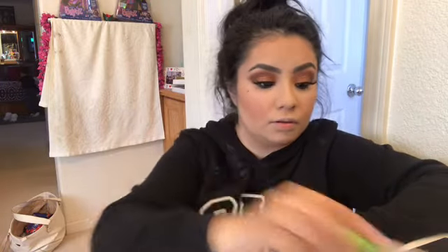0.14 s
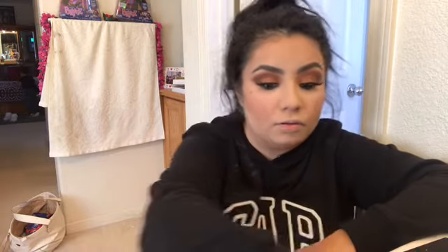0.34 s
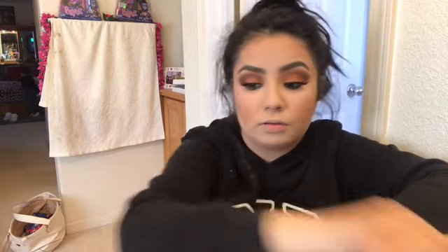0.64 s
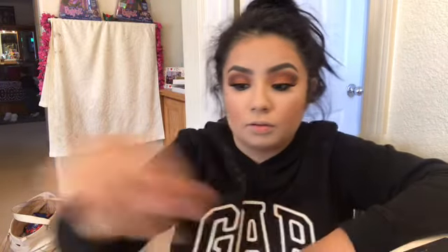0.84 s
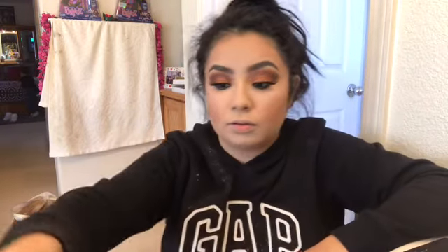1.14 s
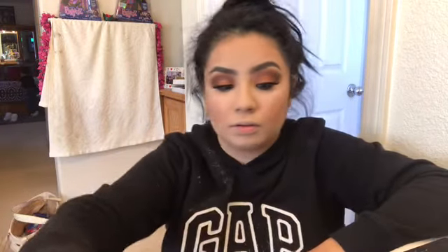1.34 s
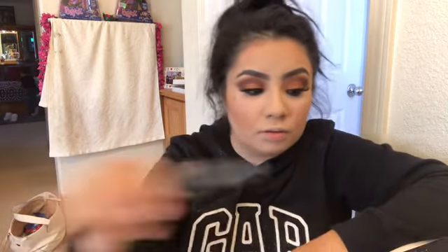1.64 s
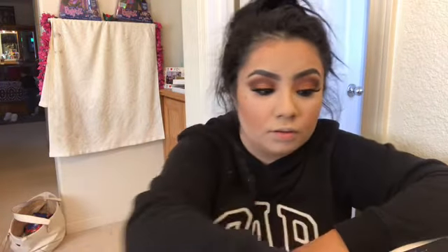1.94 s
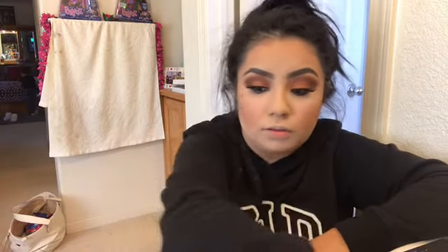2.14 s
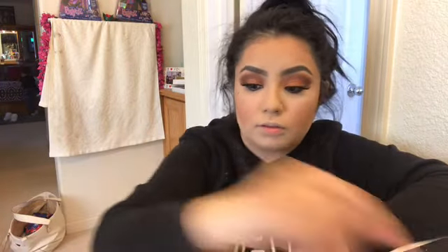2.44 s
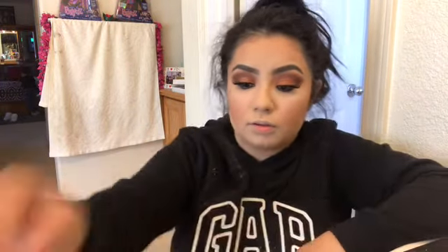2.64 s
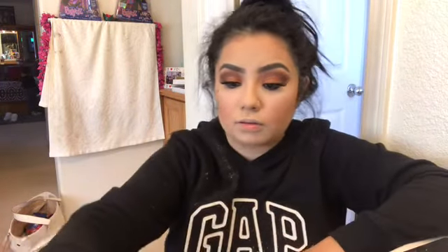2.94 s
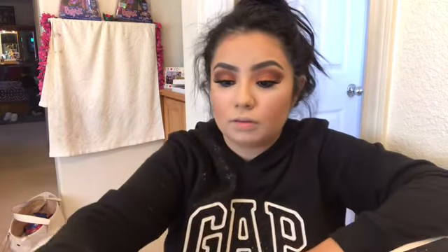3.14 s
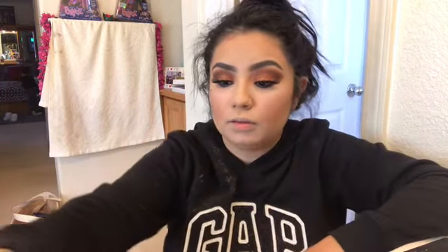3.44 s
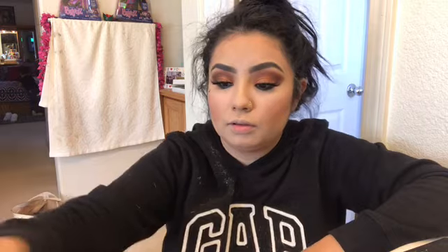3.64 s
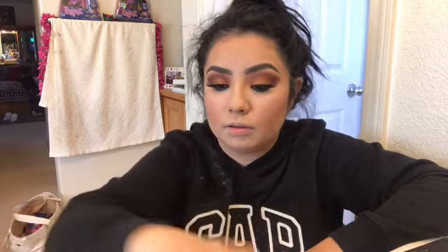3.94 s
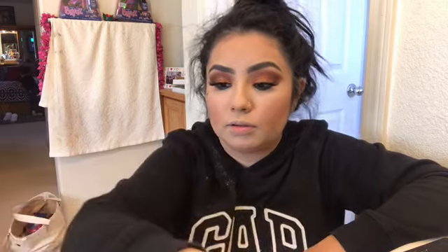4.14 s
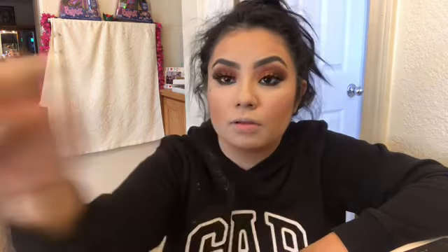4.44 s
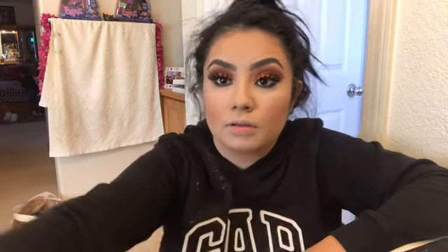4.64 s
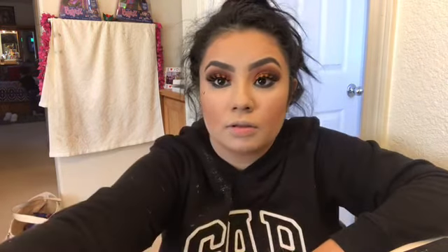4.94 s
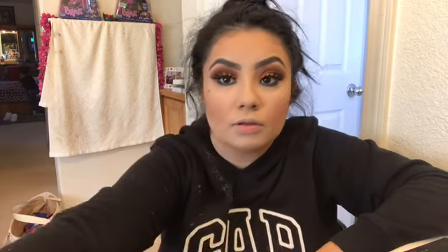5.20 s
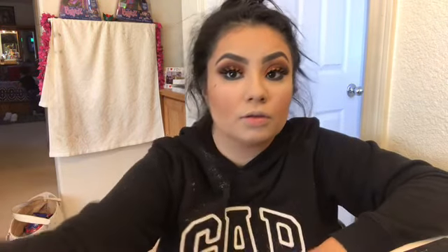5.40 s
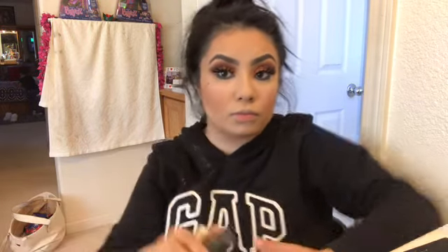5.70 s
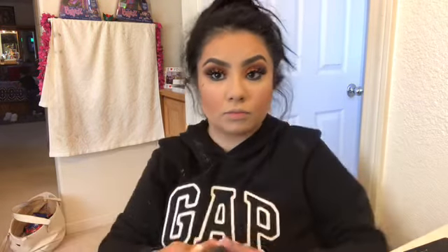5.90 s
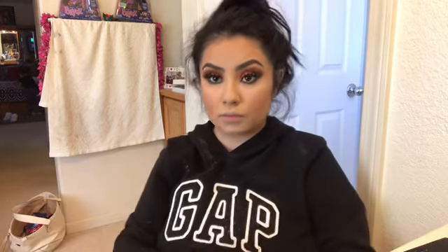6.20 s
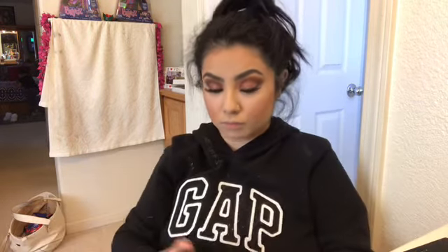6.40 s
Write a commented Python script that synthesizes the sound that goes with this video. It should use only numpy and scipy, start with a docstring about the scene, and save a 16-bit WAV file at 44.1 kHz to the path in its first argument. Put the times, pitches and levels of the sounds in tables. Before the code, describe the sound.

Small plastic items are put down on a hollow-sounding table, close to the microphone. Early clicks and brief grainy scrapes are quiet, with long gaps between taps. Muffled arm bumps lead into the loudest moment, a burst of several hard clacks with a low boom. A dull knock follows, then a ringing case snap and tiny last clicks in lightly reverberant room air.

```python
"""A table top in a small room: small cosmetics land on it, click together and slide, heard by a microphone on it.
Landings excite modes of the top and a dense crack of the item; treble arrives before bass, and a low mode booms.
Hand-held plastic clicks and clinks with much room, a hollow case rings when snapped, soft bumps thud.
Uneven scrapes are grainy noise; beneath lie steady room air, hiss and faint ticking of the electronics."""
import sys
import numpy as np
from scipy import signal
from scipy.fft import rfft, irfft
from scipy.io import wavfile
from scipy.ndimage import uniform_filter1d, map_coordinates

SR = 44100
rng = np.random.default_rng(int(sys.argv[2]) if len(sys.argv) > 2 else 0)


def wrap_up_sound(samples):
    """Save the sound to the file named by the first command line argument, as 16-bit audio."""
    columns = np.atleast_2d(samples).T
    # keep every value between -1 and 1, then stretch to whole-number steps
    tamed = np.clip(columns, -1, 1)
    steps = np.round(tamed * 32767).astype(np.int16)
    wavfile.write(sys.argv[1], SR, steps)


N = 289334

# Landings. Each row: treble arrival in seconds, level in dB, weight (lowest band) in dB, hardness in dB per octave,
# share of the free ring time, boom in dB before BOOM_LIFT_DB, travel time through the top at 1 kHz in seconds.
LANDINGS = [(.478, -45, -6, -4, 0.54, -70, 0.0013), (0.603, -43, 4.5, -4.5, 0.11, -52, .003),
            (1.376, -32.5, -6.5, 3.5, 0.63, -45.5, 0.0043), (2.919, -37.5, 1, -1, 0.76, -44, 0.0077),
            (3.036, -41, 1.5, 4.5, 0.6, -55.5, 0.0063), (4.166, -51, 3.5, 0, .9, -51.5, 0.0013),
            (4.744, -15.5, -5.5, -1, 0.44, -31.5, 0.00078), (4.753, -18.5, -2.5, 0, 0.86, -25.5, 0.00084),
            (4.761, -20.5, -7, 2.5, 0.28, -26.5, .0008), (4.771, -24.5, 6, 6.5, .85, -24, .0008),
            (4.787, -20, 2, -4, .5, -29.5, .0014), (4.816, -38.5, 10, -2.5, 0.15, -31, .0014),
            (5.203, -24, -2, -10, 0.4, -27, 0.00096), (5.249, -41, -8, -2.5, 0.66, -35, 0.0012)]
# Plastic touching in the hand. Each row: start in seconds, level in dB before CLICK_TRIM_DB,
# weight (lowest band) in dB, hardness in dB per octave.
HAND_CLICKS = [(.423, -70, -2, 2), (.44, -48.5, 0, 2), (.455, -49, 6, -2), (.474, -48.5, 4, -3.5),
               (.486, -52.5, -0.5, -2.5), (.53, -47, -26, -7), (.55, -53.5, 0, -6.5), (.651, -56, 9, 3),
               (2.002, -65.5, 6, 5.5), (2.182, -52, 2, 0), (4.16, -48, -21, 3.5), (4.18, -55.5, -2, -0.5),
               (4.214, -46.5, -16.5, -3.5), (4.953, -63, -8, 4.5), (5.847, -54.5, -6, 8.5),
               (5.88, -35, -9.5, 1), (6.46, -68, 2, 7), (6.534, -58, -6.5, -8)]
# Soft bumps of hand and arm. Each row: start in seconds, level in dB, weight (lowest band) in dB.
SOFT_BUMPS = [(1.326, -59, 5.5), (2.108, -59, 0.5), (2.306, -60, -3), (4.111, -67, 18), (4.324, -62.5, 12),
              (4.372, -50, -3), (4.453, -47, -6.5), (4.488, -61, 0), (4.531, -65, 13.5), (4.59, -56, -4),
              (5.069, -51, -5), (5.185, -51.5, 0), (5.382, -68.5, 8.5)]
# Snaps of the hollow case. Each row: start in seconds, dry ring peak in dB.
CASE_SNAPS = [(5.848, -37), (5.882, -26.5), (5.915, -34), (5.938, -36.5), (6.375, -52)]
# Pushes along the top. Each row: fastest moment in seconds, level there in dB.
PUSHES = [(.48, -46), (0.629, -56), (1.47, -54), (1.52, -55.5), (2.03, -61.5), (2.21, -57), (2.37, -64.5),
          (4.46, -61.5), (4.74, -55.5)]
# Things of one clear pitch: caps and tubes, and at 5.879 s the high mode of the hollow case. Each row: start in
# seconds, pitch in Hz, level in dB, t60 in seconds.
CLINKS = [(2.002, 2070, -48.5, 0.031), (2.089, 2050, -49.5, 0.031), (2.183, 1950, -34, 0.017),
          (4.771, 2150, -14.5, 0.018), (5.25, 1350, -20.5, 0.0097), (5.879, 4960, -54.5, .05),
          (6.335, 1410, -44.5, 0.027)]

# Modes of table top, case and padded contact. Each row: frequency in Hz, relative level in dB,
# free t60 in seconds (each use shortens it by a share).
TABLE_MODES = [(72, -21.5, .3), (173, -8, 0.081), (247, -12.5, 0.19), (352.3, -12, 0.33),
               (420, -12.5, 0.23), (472.5, -9, 0.2), (538.5, 2, 0.13), (668, 0, 0.078), (795, -0.5, 0.089),
               (864, -0.5, 0.13), (919.5, -17, 0.09), (1200, 2.5, 0.072), (1306, -3.5, 0.042),
               (1376, -4.5, 0.11), (1470, -3.5, 0.12), (1571, -2, 0.086), (2025, -27, .05),
               (2080, -12, 0.066), (2395, -9.5, .07), (2403, -5, 0.11), (2510, -7, 0.088)]
CASE_MODES = [(543, -4, 0.22), (578, -0.5, 0.15), (602, 4.5, 0.16), (686, -6, 0.19), (686.4, 6, 0.41),
              (936, -7, 0.19), (1086, -15, 0.25), (1550, -29, 0.17), (2366, -8.5, 0.12), (2210, -19, 0.38),
              (2460, -7, 0.11), (2530, -11, 0.28), (3370, -19.5, 0.15)]
PADDED_MODES = [(79, -13, 0.12), (121, -16, 0.62), (166, -5, 0.083), (231, 2.5, 0.085), (293, -1, 0.043),
                (475.4, 1, 0.075), (636, -15.5, .06), (910, -4, 0.18)]

# Colours of item crack, wall reflections, scrape, room air, hiss and rim tick.
# Each row: frequency in Hz, relative spectral level in dB.
CRACK_SPECTRUM = [(30, -41), (100, -15.5), (300, 0), (650, 7.5), (1500, 1), (1800, -3), (2150, 6.5),
                  (2600, 2.5), (2950, -12), (3400, -18), (4000, -49.5), (6500, -48), (15000, -66)]
WALL_SPECTRUM = [(40, -27), (150, 1.5), (600, 0), (1000, -4.5), (1500, 4.5), (1900, -4.5), (2300, 4),
                 (2550, 3), (2900, 2.5), (3500, 9.5), (8000, -9.5)]
SCRAPE_SPECTRUM = [(50, -13), (120, 1), (240, -19), (320, 5.5), (450, -6), (650, 3.5), (850, -7),
                   (1000, -3.5), (1300, -7.5), (1800, -14), (2450, -14), (3000, -33.5), (4200, -63.5)]
AIR_SPECTRUM = [(12, -52), (20, -30.5), (46, -7.5), (117, -3.5), (151, -11.5), (179, -8), (236, -10),
                (305, -10.5), (339, -10), (476, -11.5), (1000, -16), (1110, -17.5), (3230, -22.5),
                (4200, -46.5), (7110, -120)]
HISS_SPECTRUM = [(2500, -33), (3500, 1.5), (4300, 1), (5000, -3), (5600, 0.5), (6800, -1), (8000, -5),
                 (9700, -6), (10400, -11), (11300, -6.5), (15700, -8.5)]
RIM_SPECTRUM = [(500, -26), (2500, 6.5), (3300, -2.5), (4300, -4), (5100, -9), (5600, -13), (6800, -13.5),
                (8000, -28), (15000, -22.5)]
# Colour of the electronic ticking. Each row: frequency in Hz, relative spectral level in dB.
TICKING_SPECTRUM = [(600, -23.5), (1700, -2), (2500, 9.5), (3400, -12.5), (4300, -18.5), (8000, -42.0)]
# Decay of the room. Each row: frequency in Hz, t60 in seconds.
ROOM_T60 = [(150, 0.58), (600, .42), (1700, 0.31), (2400, 0.4), (3200, 0.21), (5000, .22), (12000, .12)]

# Tone bands of a contact. Each row: lower edge in Hz, upper edge in Hz.
TONE_BANDS_HZ = [(150, 450), (450, 1000), (1000, 1800), (1800, 2700), (2700, 3800)]
# Usual tone of landings, clicks and bumps. Each entry: level in dB for one tone band, relative to the contact.
LANDING_BANDS_DB = [-6, 0.5, -6.5, -13.5, -29.5]
USUAL_CLICK_BANDS_DB = [0, -0.5, 0.5, -0.5, -15.5]
USUAL_BUMP_BANDS_DB = [1.5, -0.5, -18, -24, -44]

HIT_SIZE = 32768  # samples
AGE_S = np.arange(HIT_SIZE) / SR
HIT_HZ = np.fft.rfftfreq(HIT_SIZE, 1 / SR)
TIME_S = np.arange(N) / SR
TOP_HZ = 15750
BLOW_S = 0.012  # span over which contact levels are rms
KNOCK_ROOM_DB, CRACK_FREE_T60_S = -21, 0.14
EDGE_PATH, EDGE_DB = 3.2, -9.5  # wave back from the edge: path over the direct one, level
BOOM_LIFT_DB, CLICK_TRIM_DB = 1.5, -2.5
CLICK_USUAL_T60_S, CLICK_USUAL_DB, CLICK_DOUBLING_DB = 0.038, -47.5, 41  # t60 doubles per CLICK_DOUBLING_DB
SLIDE_RISE_DB_PER_S, SLIDE_FALL_DB_PER_S = 217, 118.5
# rim tick: dry peak at a firm blow, dB per dB of force, dB per unit of hardness
RIM_DB, FIRM_BLOW_DB, RIM_GROWTH, RIM_PER_HARDNESS_DB = -50, -19, 1.3, 3.5
CASE_HARDNESS_DB_PER_OCTAVE = 2.5
AIR_DB, HISS_DB = -67.5, -75


def amp(db):
    """Decibels to gain."""
    return 10 ** (np.asarray(db) / 20)


def unit(x):
    """Scale to rms 1."""
    return x / np.sqrt(np.mean(x ** 2) + 1e-20)


def fade(t_s, t60_s):
    """Exponential decay, 60 dB in t60_s."""
    return np.exp(-np.log(1000) * t_s / np.maximum(t60_s, 1e-3))


def along(points, hz):
    """Interpolate (Hz, value) points on a log frequency axis."""
    point_hz, values = np.transpose(points)
    return np.interp(np.log(hz + 1), np.log(point_hz + 1), values)


def add(track, start_s, sound):
    """Mix a sound into a track."""
    start = round(start_s * SR)
    track[start:start + len(sound)] += sound[:N - start]


def noise(spectrum):
    """Steady coloured noise of rms 1."""
    gain = amp(along(spectrum, np.fft.rfftfreq(N, 1 / SR)))
    return unit(irfft(rfft(rng.standard_normal(N)) * gain, N))


def coloured(x, spectrum):
    """Minimum-phase colouring of one hit: nothing sounds before the contact."""
    cepstrum = irfft(np.log(amp(along(spectrum, HIT_HZ))))
    cepstrum[1:HIT_SIZE // 2] *= 2
    cepstrum[HIT_SIZE // 2 + 1:] = 0
    return irfft(rfft(x) * np.exp(rfft(cepstrum)))


def contact_tone(usual_db, db, weight_db, hardness=0):
    """Band levels of a contact: weight adds bass, hardness lifts treble octave by octave."""
    centres_hz = np.sqrt(np.prod(TONE_BANDS_HZ, axis=1))
    octaves = np.log2(centres_hz / centres_hz[1])
    return db + np.array(usual_db) + weight_db * (octaves < 0) + hardness * np.maximum(octaves, 0)


def voiced(x, bands_db):
    """Steer a hit towards its contact tone: hard is bright, soft is dull."""
    for _ in range(2):  # neighbouring bands overlap
        power = 2 * np.abs(rfft(x)) ** 2 / (HIT_SIZE * BLOW_S * SR)
        gains = []
        for (low_hz, high_hz), db in zip(TONE_BANDS_HZ, bands_db):
            band_power = power[(HIT_HZ > low_hz) & (HIT_HZ < high_hz)].sum()
            gains.append((np.sqrt(low_hz * high_hz), db - 10 * np.log10(band_power)))
        x = coloured(x, gains)
    return x


def ring(modes, length, scatter_db):
    """Damped modes of rms 1; every blow excites them at slightly new strengths."""
    hz, db, t60_s = np.transpose(modes)[:, :, None]
    sign = (-1) ** np.arange(len(hz))[:, None]
    strength = sign * amp(db + scatter_db * rng.standard_normal(hz.shape))
    contact = 1 - np.exp(-(AGE_S / 0.00028) ** 2)  # the force takes a moment to build
    partials = strength * np.sin(2 * np.pi * hz * AGE_S) * fade(AGE_S, t60_s * length)
    return unit(contact * np.sum(partials, axis=0))


def crack(t60_s):
    """Dense, short ringing of a small hard item: decaying coloured noise, rms 1."""
    burst = rng.standard_normal(HIT_SIZE) * fade(AGE_S, t60_s) * (1 - np.exp(-AGE_S / 0.00017))
    return unit(coloured(burst, CRACK_SPECTRUM))


def through_top(x, lag_s):
    """Bending waves travel faster the higher they are: bass arrives last (lag_s at 1 kHz)."""
    return irfft(rfft(x) * np.exp(-4j * np.pi * lag_s * np.sqrt(1000 * HIT_HZ)))


def in_room(x, wet_db):
    """A hit plus the answer of the walls, which builds up, then decays per frequency."""
    hz, t_s, cells = signal.stft(rng.standard_normal(HIT_SIZE), SR, nperseg=256)
    decaying = cells * fade(t_s, along(ROOM_T60, hz)[:, None])
    tail = signal.istft(decaying, SR, nperseg=256)[1][:HIT_SIZE]
    tail = coloured(tail * (1 - np.exp(-AGE_S / 0.0027)), WALL_SPECTRUM)
    below_treble = HIT_HZ < TONE_BANDS_HZ[3][1]
    tail /= np.sqrt(np.mean(np.abs(rfft(tail)[below_treble]) ** 2))
    return x + amp(wet_db) * signal.fftconvolve(x, tail)[:HIT_SIZE]


def without_rumble(x, hz):
    """Deep bass of the landings, boom and bumps is thinned out."""
    return signal.sosfilt(signal.butter(2, hz, "high", fs=SR, output="sos"), x)


def knocks():
    """Landings ring top and item; the wave arrives directly and again from the edge."""
    track = np.zeros(N)
    for arrival_s, db, weight_db, hardness, length, _, lag_s in LANDINGS:
        crack_t60_s = CRACK_FREE_T60_S * length
        blow = ring(TABLE_MODES, length, scatter_db=4.0) + amp(-6.5) * crack(crack_t60_s)
        direct = through_top(blow, lag_s)
        edge = amp(EDGE_DB) * through_top(crack(crack_t60_s), EDGE_PATH * lag_s)
        hit = voiced(direct + edge, contact_tone(LANDING_BANDS_DB, db, weight_db, hardness))
        treble_delay_s = lag_s * np.sqrt(1000 / TONE_BANDS_HZ[-1][0])
        add(track, arrival_s - treble_delay_s, in_room(hit, KNOCK_ROOM_DB))
    return track


def boom(hz, t60_s):
    """A low mode of the table swings on; every landing sets its size anew."""
    landing_s, *_, boom_db, _ = np.transpose(LANDINGS)
    last = np.maximum(np.searchsorted(landing_s, TIME_S) - 1, 0)
    decay = fade(np.abs(TIME_S - landing_s[last]), t60_s)
    swing = amp(boom_db[last] + BOOM_LIFT_DB) * decay * (TIME_S > landing_s[0])
    return uniform_filter1d(swing, size=300) * np.sin(2 * np.pi * hz * TIME_S)


def rims():
    """Thin high ticks of hard rims, growing faster in dB than the landing or snap itself."""
    track = np.zeros(N)
    contacts = [(s, db, hardness) for s, db, _, hardness, *_ in LANDINGS]
    contacts += [(s, db, CASE_HARDNESS_DB_PER_OCTAVE) for s, db in CASE_SNAPS]
    for start_s, db, hardness in contacts:
        burst = rng.standard_normal(HIT_SIZE) * fade(AGE_S, 0.044) * (1 - np.exp(-AGE_S / 0.001))
        tick = coloured(burst, RIM_SPECTRUM)
        peak_db = RIM_DB + RIM_GROWTH * (db - FIRM_BLOW_DB) + RIM_PER_HARDNESS_DB * hardness
        add(track, start_s, amp(peak_db) * in_room(tick / np.abs(tick).max(), wet_db=-7))
    return track


def bumps():
    """Padded contacts swell softly and give a short, dull thud."""
    track = np.zeros(N)
    for start_s, db, weight_db in SOFT_BUMPS:
        thud = ring(PADDED_MODES, 0.7, scatter_db=5.0) + amp(-0.5) * crack(0.046)
        thud *= 1 - np.exp(-AGE_S / 0.005)
        tone = contact_tone(USUAL_BUMP_BANDS_DB, db, weight_db)
        add(track, start_s, in_room(voiced(thud, tone), wet_db=-3))
    return track


def clicks():
    """Hand-held plastic ticks come through the air with much room; firmer ones rattle longer."""
    track = np.zeros(N)
    for start_s, db, weight_db, hardness in HAND_CLICKS:
        t60_s = CLICK_USUAL_T60_S * 2 ** ((db - CLICK_USUAL_DB) / CLICK_DOUBLING_DB)
        tick = voiced(crack(t60_s), contact_tone(USUAL_CLICK_BANDS_DB, db, weight_db, hardness))
        add(track, start_s, amp(CLICK_TRIM_DB) * in_room(tick, wet_db=-4.5))
    return track


def clinks():
    """A light cap or tube, or the hollow case's high mode, rings with a single short mode."""
    track = np.zeros(N)
    for start_s, hz, db, t60_s in CLINKS:
        tone = np.sin(2 * np.pi * hz * AGE_S) * fade(AGE_S, t60_s) * (1 - np.exp(-AGE_S / 0.00053))
        add(track, start_s, amp(db) * in_room(tone, wet_db=-8.5))
    return track


def case():
    """The modes of the hollow case ring on after each snap."""
    track = np.zeros(N)
    for start_s, db in CASE_SNAPS:
        tone = ring(CASE_MODES, 0.49, scatter_db=6.0)
        add(track, start_s, amp(db) * in_room(tone / np.abs(tone).max(), wet_db=-5.5))
    return track


def slides():
    """A push speeds up and runs out; the item catches and slips, so its scrape is grainy."""
    push = np.zeros(N)
    for peak_s, db in PUSHES:
        rise_db = SLIDE_RISE_DB_PER_S * (peak_s - TIME_S)
        fall_db = SLIDE_FALL_DB_PER_S * (TIME_S - peak_s)
        push += amp(db - np.maximum(rise_db, fall_db))
    grip = map_coordinates(rng.standard_normal(N), [TIME_S * 130])  # 130 random values a second
    return push * unit(noise(SCRAPE_SPECTRUM) * amp(2 * grip))


def electronics(level_db, spread_db):
    """The recorder's circuits tick faintly, twenty times a second: gated noise of varying size."""
    count = int(N / SR * 20) + 2
    nearest = np.round(TIME_S * 20).astype(int)
    size = amp(level_db + spread_db * rng.standard_normal(count))
    gate = np.exp(-((TIME_S - nearest / 20 + 0.00085) / 0.0023) ** 2)
    return size[nearest] * gate * noise(TICKING_SPECTRUM)


def background():
    """Quiet room air, with the hiss and ticking of the electronics."""
    air = amp(AIR_DB) * noise(AIR_SPECTRUM)
    hiss = amp(HISS_DB) * noise(HISS_SPECTRUM)
    return air + hiss + electronics(level_db=-66.5, spread_db=1.5)


def scene():
    """Everything summed at one microphone."""
    table = without_rumble(knocks() + boom(hz=119, t60_s=0.94) + bumps(), hz=67)
    return (table + clicks() + clinks() + rims() + case() + slides() + background())[None]


def record(dry):
    """The recorder keeps nothing from its band limit upwards."""
    return irfft(rfft(dry) * (np.fft.rfftfreq(N, 1 / SR) < TOP_HZ), N)


dry = scene()
out = record(dry)
wrap_up_sound(out)
```